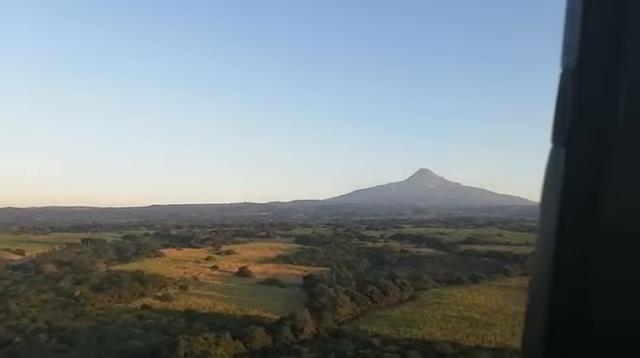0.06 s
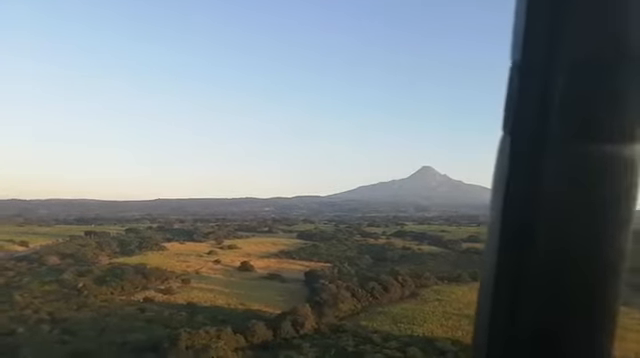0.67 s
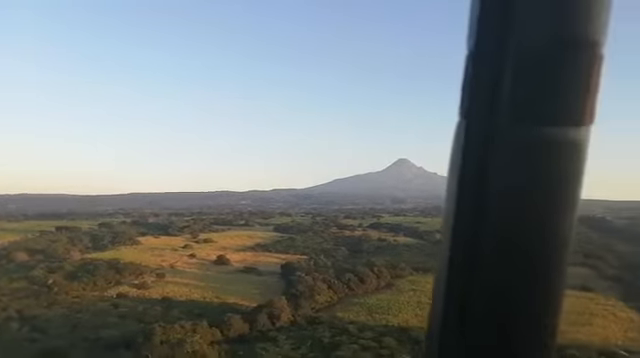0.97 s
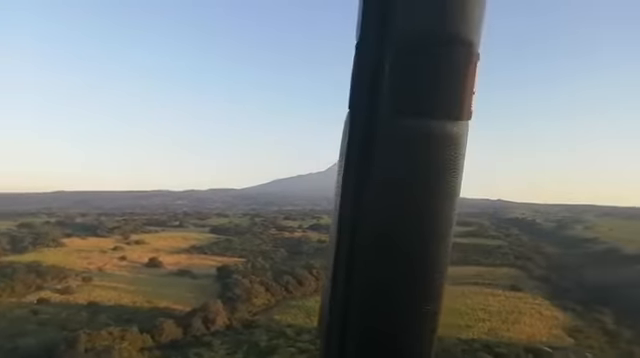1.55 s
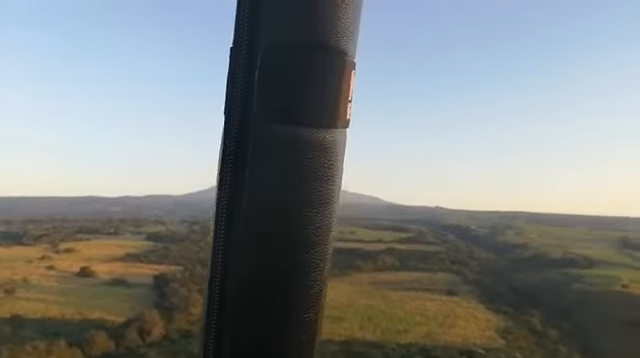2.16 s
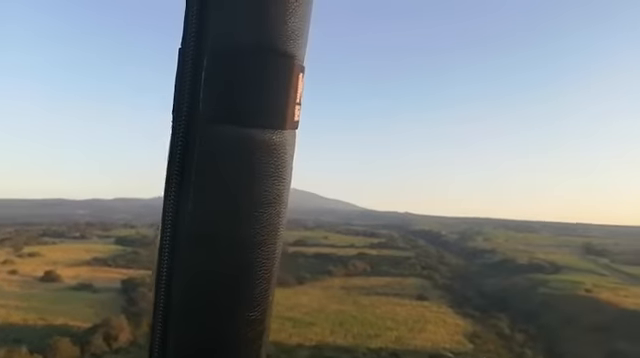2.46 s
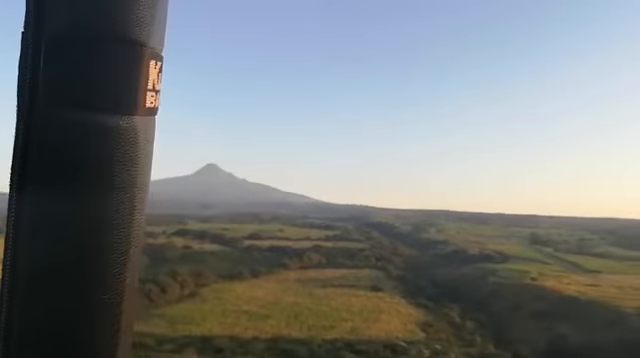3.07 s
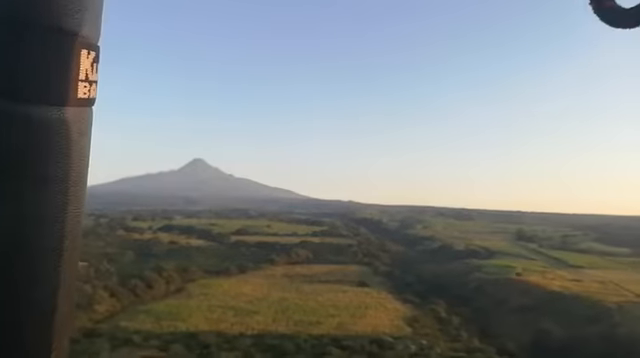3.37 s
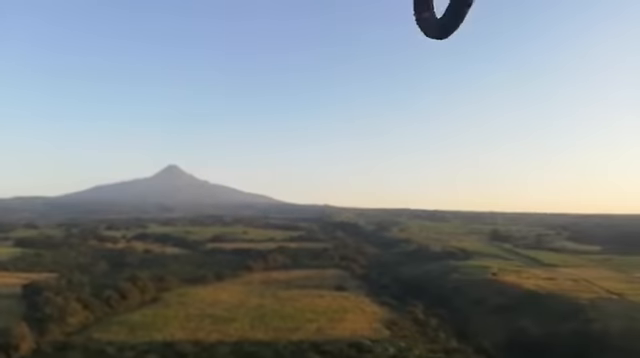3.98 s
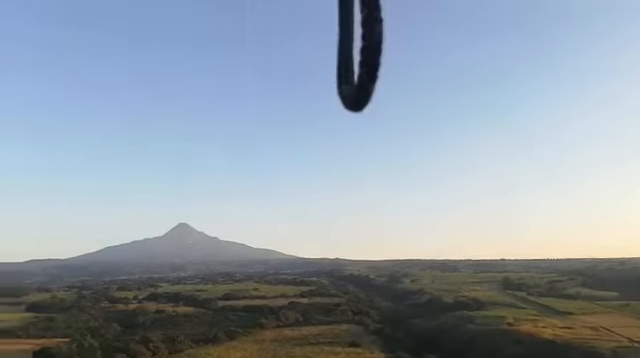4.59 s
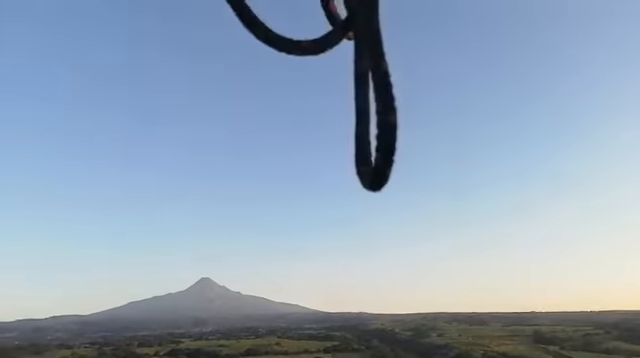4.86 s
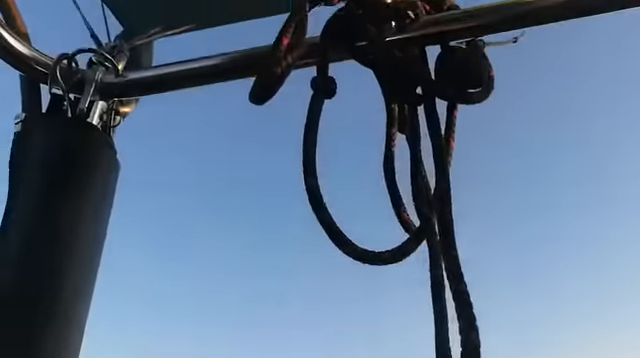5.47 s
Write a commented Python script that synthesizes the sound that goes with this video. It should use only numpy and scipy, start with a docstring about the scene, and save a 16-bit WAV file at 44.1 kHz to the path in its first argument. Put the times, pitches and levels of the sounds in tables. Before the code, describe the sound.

A hot-air balloon's gas burner fires close overhead, a loud, deep roar of flame with a bright hiss of gas jets and a few low puffs. After about three seconds the roar swells, then cuts off quickly, the last gas burning away with a soft puff. Only the pilot flame remains, a faint thin hiss over a low flutter, heard from the basket in quiet open air.

```python
"""A loud roar and hiss: a hot-air balloon's propane burner fires above the basket, over quiet country.
Turbulent combustion makes the roar and its low puffs; turbulent gas jets make the hiss.
The valve shuts, the flame outlives the jets by a moment, and the last gas burns off with a soft puff.
The pilot flame remains: a thin hiss, coloured by the resonances of its tube, over a low flutter."""
import sys
import numpy as np
from scipy import signal
from scipy.fft import rfft, irfft
from scipy.io import wavfile
from scipy.ndimage import uniform_filter1d

SR = 44100
rng = np.random.default_rng(int(sys.argv[2]) if len(sys.argv) > 2 else 0)


def output_pcm(signal):
    """Save a mono or channel-first signal as 16-bit PCM at the path in sys.argv[1].

    Samples are clipped to [-1, 1] before scaling.
    """
    pcm = np.clip(np.atleast_2d(signal).T, -1, 1) * 32767
    wavfile.write(sys.argv[1], SR, np.round(pcm).astype(np.int16))


N = 243873
T = np.arange(N) / SR
HOP = 128  # short frames for hiss; frames eight times longer resolve the bass
HISS_HZ, HISS_S = np.fft.rfftfreq(4 * HOP, 1 / SR), np.arange(N // HOP + 5) * HOP / SR
BASS_HZ, BASS_S = np.fft.rfftfreq(32 * HOP, 1 / SR), np.arange(N // HOP // 8 + 5) * 8 * HOP / SR
SHUT_S, CLOSING_S = 3.215, 0.13  # when the blast valve is fully shut, and how long it takes to close

# Combustion noise, before the blaze shifts it in frequency: frequency_hz, relative_db
ROAR_SPECTRUM = [(20, -29), (40, -8.5), (70, -2), (110, -1), (180, -5.5), (270, -9), (365, -7.5),
                 (410, -5.5), (625, -7), (735, -14.5), (940, -14), (1200, -18.5), (1800, -21), (2600, -26),
                 (8000, -75)]
# Broad resonances of the roar, before the same shift: centre_hz, width_hz, relative_db
ROAR_RESONANCES = [(142, 33, 0), (222.4, 42, -.3), (312.6, 47, -2), (515, 48, -5), (616, 64, -5),
                   (685, 33, -17.5), (1044, 39, -15), (1335, 48, -21)]
# How hard the flame burns: time_s, above_steady_db
BLAZE_CURVE = [(.22, 2), (.42, 0.1), (2.45, 0), (2.95, 3.9), (3.1, 3)]
# Stereo balance of the roar: frequency_hz, left_minus_right_db
ROAR_BALANCE = [(50, 3), (500, 4), (1200, 3), (2500, 2.5)]
# Left-right likeness of the roar: frequency_hz, coherence_ratio
ROAR_COHERENCE = [(100, .999), (550, 1), (1100, 0.89), (2500, 0.83)]
# Puffs of flame; the one just after the valve shuts is the last gas: peak_s, level_db, boom_hz, spread_s
FLAME_PUFFS = [(.81, -25.5, 139, 0.023), (1.07, -31, 135, 0.026), (1.54, -25, 120, 0.013),
               (1.65, -29.5, 120, .016), (2.2, -29, 120, 0.0088), (3.246, -47.5, 78, .029),
               (3.47, -62, 238, 0.091), (4.35, -62, 80, 0.035)]
# Hiss of the gas jets: frequency_hz, relative_db
JET_SPECTRUM = [(300, -28), (900, -4.5), (1800, -1.5), (2800, -1.5), (4400, 0), (5500, -0.5), (6300, -2.5),
                (7400, -0.5), (8300, -4), (9600, 1.5), (10600, 1), (12000, -5), (13200, -7), (14300, -9.5)]
# Stereo balance of the jets: frequency_hz, left_minus_right_db
JET_BALANCE = [(1500, -1.5), (5000, -0.5), (9300, 0.9), (11000, -3.5), (14000, -4.5)]
# Left-right likeness of the jets: frequency_hz, coherence_ratio
JET_COHERENCE = [(800, 0.5), (2500, 0.029), (6000, 0.015), (14000, 0)]
# Hiss of the pilot's jet: frequency_hz, relative_db
PILOT_SPECTRUM = [(500, -17), (1500, -14.5), (2100, -11), (3100, -12), (3900, -14), (5500, -13),
                  (7000, -16), (7900, -17), (8300, -24), (8900, -15), (10300, -17), (11100, -24),
                  (12700, -26), (14300, -32)]
# Settled resonances of the pilot's tube: centre_hz, width_hz, relative_db
TUBE_MODES = [(1890, 130, -13.5), (2360, 150, -6.5), (2640, 120, -1.5), (3470, 200, -12.5),
              (4540, 175, 0.7), (4800, 170, -4), (5800, 190, -8.5), (6360, 360, -10), (9130, 480, -10),
              (11600, 550, -15), (13450, 400, -23)]
# How strongly the tube rings: time_s, gain_db
TUBE_RING_CURVE = [(3.25, -3.5), (3.55, 2), (3.87, -2), (4.65, 1), (5.1, 0), (5.5, -3)]
# Stereo balance of the pilot: frequency_hz, left_minus_right_db
PILOT_BALANCE = [(100, 3.5), (700, 4), (2000, 1), (4600, -2), (5800, 1), (8000, 0.5), (9100, 3),
                 (11500, -2), (13500, -4)]
# Left-right likeness of the pilot: frequency_hz, coherence_ratio
PILOT_COHERENCE = [(150, 0.99), (450, 0.83), (800, .5), (1400, 0.098), (4600, 0.21), (8000, .05)]
# Combustion noise of the pilot: frequency_hz, relative_db
FLUTTER_SPECTRUM = [(20, -18), (48, -15), (95, -8), (190, -10), (260, -12), (400, -15.5), (620, -13.5),
                    (720, -17), (950, -17.5), (1100, -21.5), (1600, -28), (4000, -46.5)]
# Hums of the pilot flame: centre_hz, width_hz, relative_db
FLUTTER_HUMS = [(71, 18, 2.5), (135, 22, 0), (155.6, 15, 0.5), (274, 18, -15.5), (338, 30, -11.5),
                (1270, 78, -15.5)]


def flame_roar(steady_db=-25, flicker_db=0.78, stretch_per_db=0.0271, lag_s=0.029):
    """Combustion noise: eddies shake the heat release, and a harder blaze shifts the spectrum upward."""
    stretch = 0.97 + stretch_per_db * curve_at(BLAZE_CURVE, BASS_S)[:, None]
    field_db = resonant_spectrum(ROAR_SPECTRUM, ROAR_RESONANCES, BASS_HZ / stretch)
    field_db -= 10 * np.log10(stretch)  # stretching adds no power
    level_db = steady_db + curve_at(BLAZE_CURVE, T) + flicker_db * eddies(T, corner_hz=70)
    fuel = valve_opening(T - lag_s) ** 1.6  # the flame starves just after the jets
    return stereo_noise(field_db, ROAR_COHERENCE, ROAR_BALANCE, BASS_HZ) * gain_of(level_db) * fuel


def gas_jets(start_db=-31, sag_db_per_s=-0.61, sputter_db=0.32, dull_from_s=2.5, dull_db_per_s=-5.5):
    """Jet noise: turbulent propane hisses, weakens and dulls, then is choked off by the valve."""
    treble_db = -1.1 + dull_db_per_s * np.maximum(HISS_S - dull_from_s, 0)
    treble_db -= 5 * (1 - valve_opening(HISS_S)) ** 2
    treble_share = np.clip((HISS_HZ - 5000) / 5000, 0, 1)
    field_db = spectrum_at(JET_SPECTRUM, HISS_HZ) + treble_db[:, None] * treble_share
    field_db += 1.02 * hiss_swells()
    flow_db = start_db + sag_db_per_s * T + sputter_db * eddies(T, corner_hz=25)
    lean_left = gain_of([[0.32], [-0.32]])
    hiss = stereo_noise(field_db, JET_COHERENCE, JET_BALANCE, HISS_HZ) * lean_left
    return hiss * gain_of(flow_db) * valve_opening(T)


def valve_opening(t):
    """Throttling: the valve's opening falls linearly from 1 to nearly 0."""
    return np.clip((SHUT_S - t) / CLOSING_S, 1e-4, 1)


def puff(peak_s, level_db, boom_hz, spread_s, top_hz=400, width_octaves=0.58):
    """Thermal expansion: a pocket of gas burns in one bell-shaped swell of low noise."""
    octaves = np.log2((BASS_HZ + 1) / boom_hz)
    band_db = -20 * np.log10(1 + (octaves / width_octaves) ** 2)
    rolloff_db = -20 * np.log10(1 + (BASS_HZ / top_hz) ** 2)
    field_db = np.tile(band_db + rolloff_db, (len(BASS_S), 1))
    boom = stereo_noise(field_db, ROAR_COHERENCE, ROAR_BALANCE, BASS_HZ)
    return gain_of(level_db) * boom * np.exp(-((T - peak_s) / spread_s) ** 2 / 2)


def pilot_hiss(settled_db=-64, dip_db=-5, recover_s=0.089, sharp_share=0.04, settle_s=0.35):
    """Tube resonance colours a small jet's hiss, which is sharp and subdued until the blast ends."""
    sharpening = 1 + sharp_share * np.exp(-np.maximum(HISS_S - SHUT_S, 0) / settle_s)
    ring_db = curve_at(TUBE_RING_CURVE, HISS_S)
    modes = []
    for centre_hz, width_hz, relative_db in TUBE_MODES:
        drifting_db = relative_db + ring_db + 1.2 * eddies(HISS_S, corner_hz=3)
        modes.append((centre_hz * sharpening[:, None], width_hz, drifting_db[:, None]))
    waver_db = 0.6 * eddies(HISS_S, corner_hz=12)[:, None]
    field_db = resonant_spectrum(PILOT_SPECTRUM, modes, HISS_HZ) + waver_db + 0.8 * hiss_swells()
    flow_db = settled_db + dip_db * np.exp(-np.maximum(T - SHUT_S, 0) / recover_s)
    return stereo_noise(field_db, PILOT_COHERENCE, PILOT_BALANCE, HISS_HZ) * gain_of(flow_db)


def pilot_flutter(start_db=-61.5, grow_db_per_s=0.46):
    """Unsteady combustion: the pilot flame hums softly and grows a little once the blast is over."""
    waver_db = 0.5 * eddies(BASS_S, corner_hz=10)[:, None]
    field_db = resonant_spectrum(FLUTTER_SPECTRUM, FLUTTER_HUMS, BASS_HZ) + waver_db
    level_db = start_db + grow_db_per_s * np.maximum(T - SHUT_S, 0)
    return stereo_noise(field_db, PILOT_COHERENCE, PILOT_BALANCE, BASS_HZ) * gain_of(level_db)


def eddies(t, corner_hz):
    """Turbulent fluctuation: random wavering of rms 1 that thins out above corner_hz."""
    hz = np.fft.rfftfreq(len(t), t[1] - t[0])
    white = rfft(rng.standard_normal(len(t)))
    return unit_rms(irfft(white * (hz > 2) / np.hypot(1, hz / corner_hz), len(t)))


def hiss_swells():
    """Random modulation of rms 1: neighbouring bands swell briefly together."""
    white = rng.standard_normal((len(HISS_S), len(HISS_HZ)))
    slow = uniform_filter1d(white, size=14, axis=0)
    return unit_rms(uniform_filter1d(slow, size=5, axis=1))


def stereo_noise(field_db, coherence, balance, hz):
    """Partial coherence: two channels share some noise, shaped by frames x bins levels; mono rms is 1."""
    a, b, c, d = rng.standard_normal((4, *field_db.shape))
    left, independent = a + 1j * b, c + 1j * d
    shared = np.clip(spectrum_at(coherence, hz), -1, 1)
    right = shared * left + np.sqrt(1 - shared ** 2) * independent
    lean = gain_of(spectrum_at(balance, hz) / 2)
    spectra = np.array([left * lean, right / lean]) * gain_of(field_db)
    size = 2 * (len(hz) - 1)
    _, sound = signal.istft(spectra, nperseg=size, noverlap=size - size // 4, time_axis=1, freq_axis=2)
    return sound[:, :N] / sound[:, :N].mean(0).std()


def resonant_spectrum(base, peaks, hz):
    """Powers add: resonance peaks stand on a smooth spectrum, in dB."""
    peak_power = sum(gain_of(db) ** 2 / (1 + 2 * ((hz - centre_hz) / width_hz) ** 2) ** 2
                     for centre_hz, width_hz, db in peaks)
    return 10 * np.log10(gain_of(spectrum_at(base, hz)) ** 2 + peak_power)


def spectrum_at(points, hz):
    """Interpolation on a log-frequency axis."""
    point_hz, values = np.transpose(points)
    return np.interp(np.log(hz + 1), np.log(point_hz), values)


def curve_at(points, t):
    """Linear interpolation in time."""
    return np.interp(t, *np.transpose(points))


def gain_of(db):
    """Decibels to amplitude."""
    return 10 ** (np.asarray(db) / 20)


def unit_rms(x):
    """Normalisation to rms 1."""
    return x / np.sqrt(np.mean(x ** 2) + 1e-20)


def scene():
    """Superposition: the blast masks the pilot, which burns throughout."""
    burner = gas_jets() + flame_roar() + sum(puff(*row) for row in FLAME_PUFFS)
    return burner + pilot_hiss() + pilot_flutter()


def record(dry):
    """Band limiting: a steep low-pass filter removes the highest treble."""
    lowpass = signal.firwin(1023, cutoff=14320, window=("kaiser", 9), fs=SR)
    return signal.oaconvolve(dry, lowpass[None], "same")


dry = scene()
out = record(dry)
output_pcm(out)
```